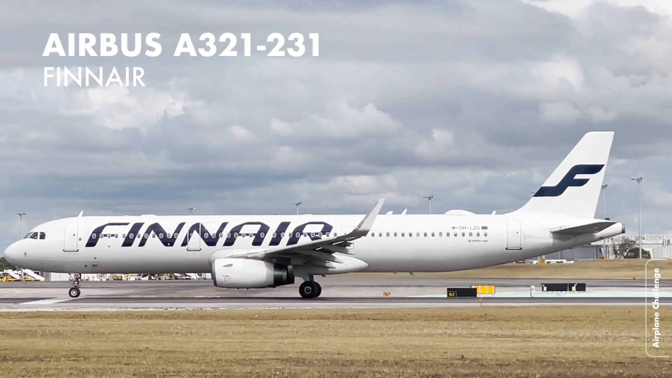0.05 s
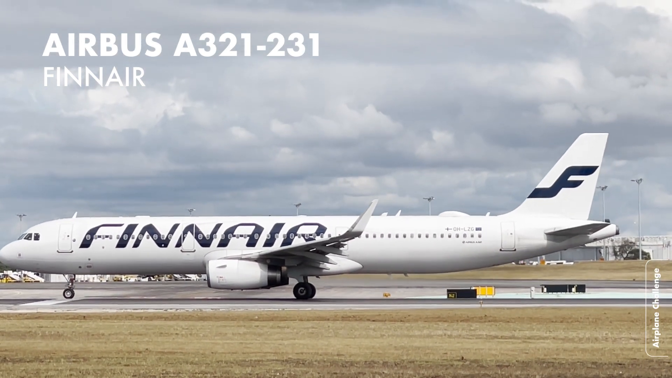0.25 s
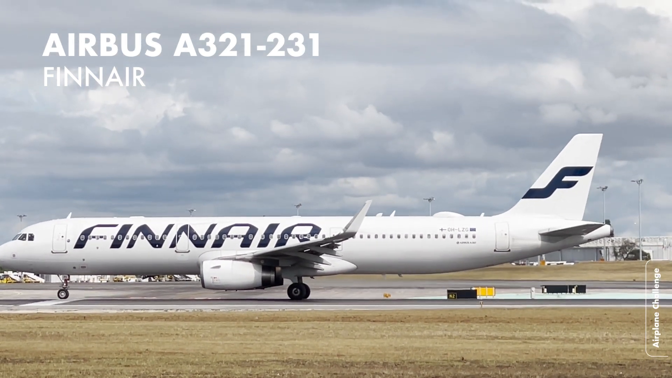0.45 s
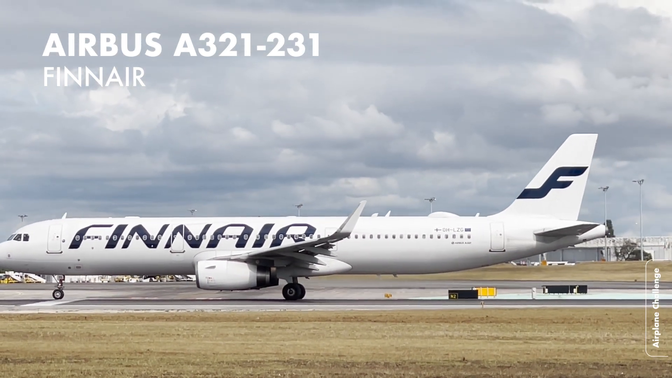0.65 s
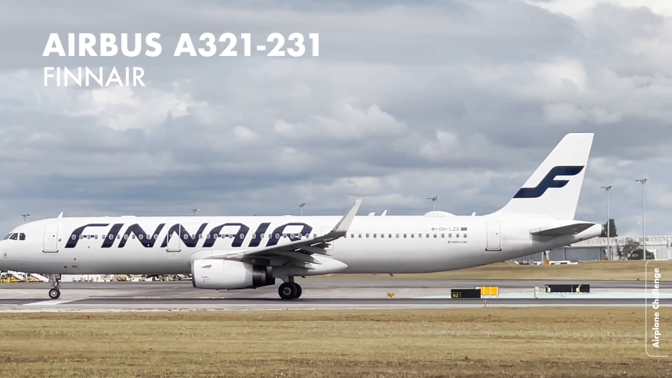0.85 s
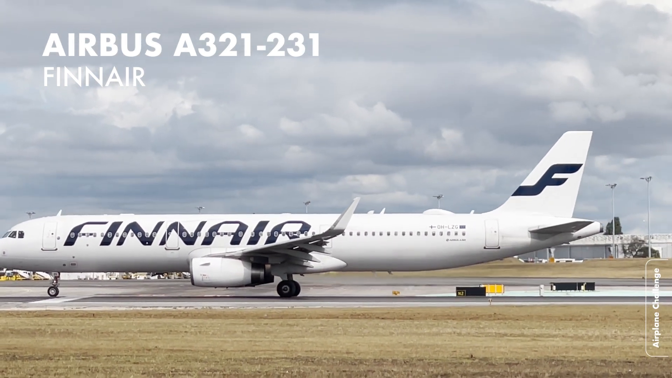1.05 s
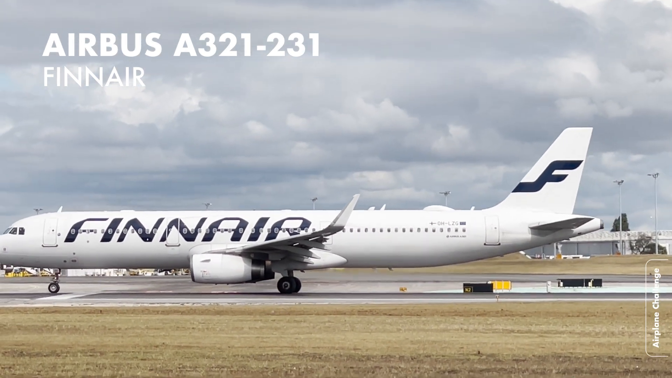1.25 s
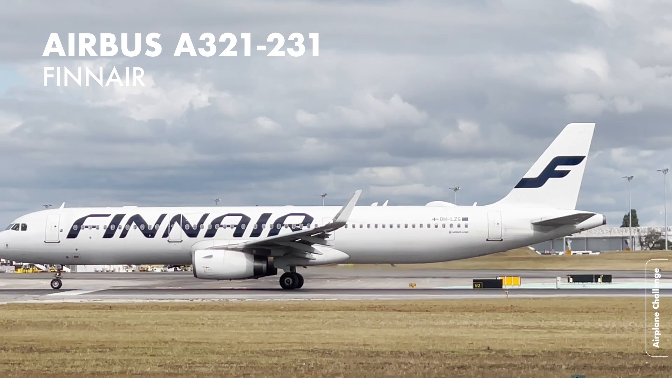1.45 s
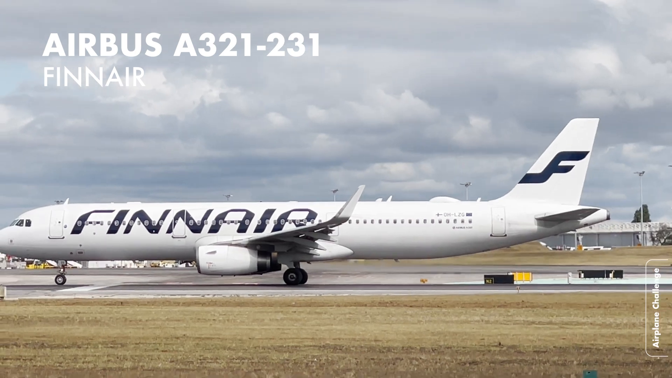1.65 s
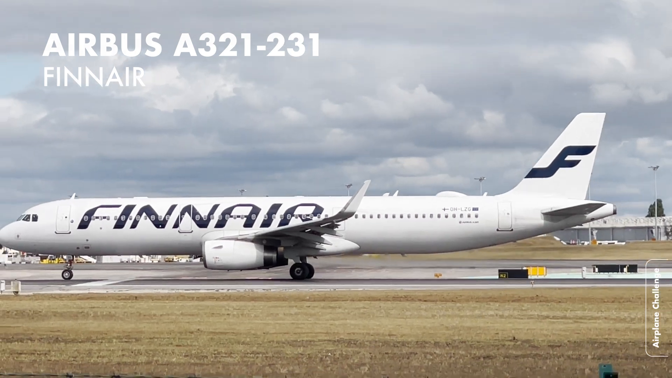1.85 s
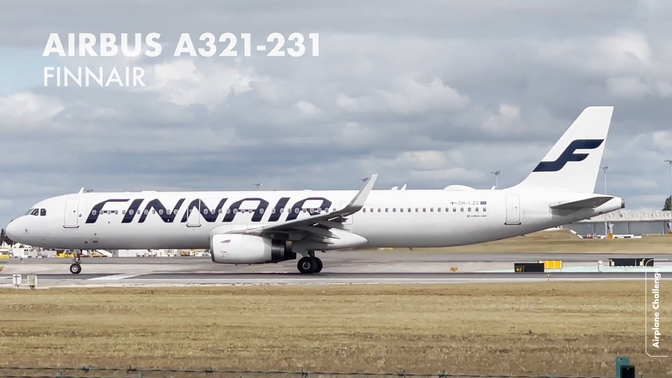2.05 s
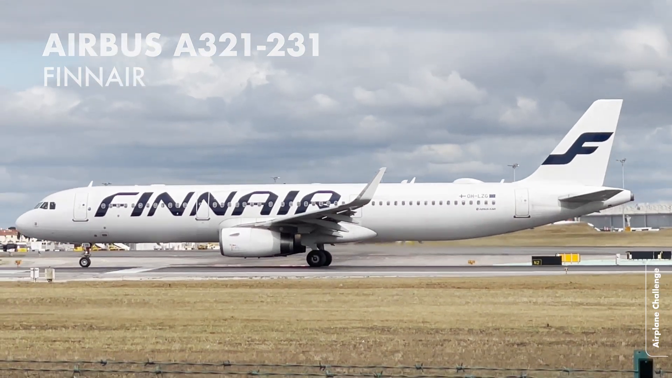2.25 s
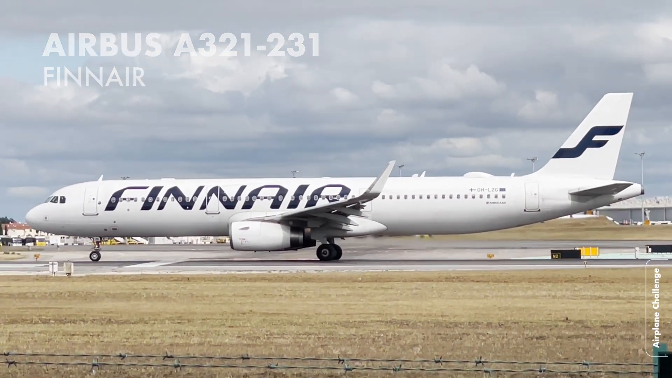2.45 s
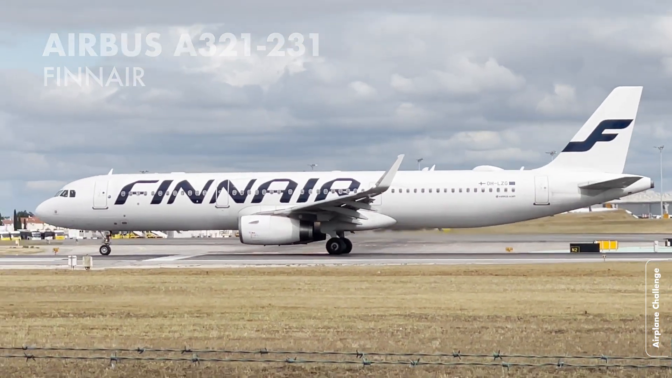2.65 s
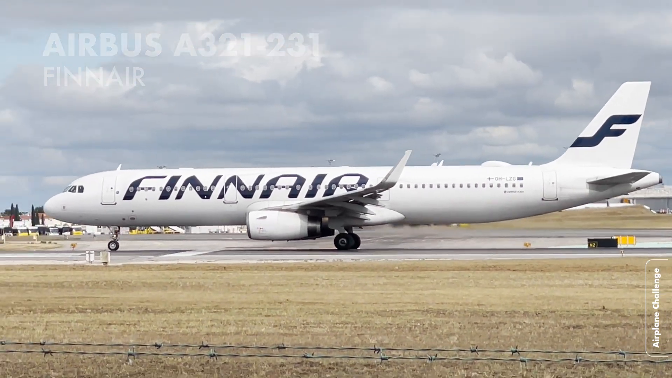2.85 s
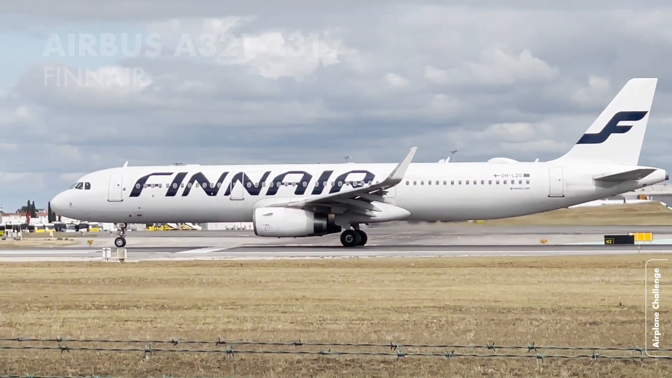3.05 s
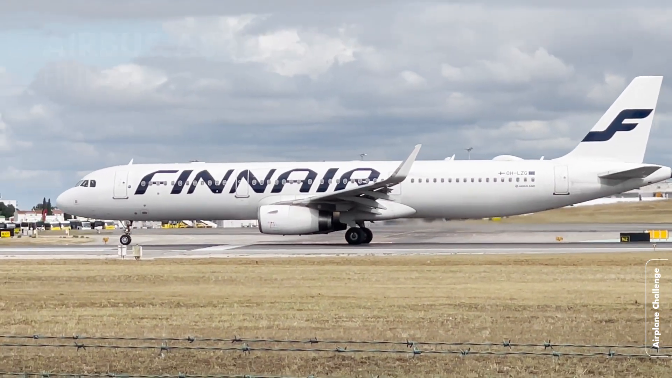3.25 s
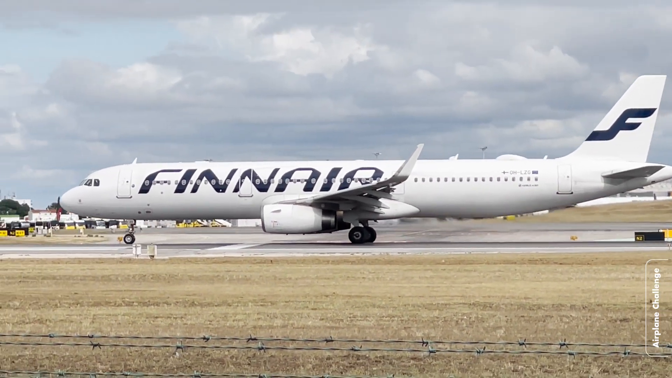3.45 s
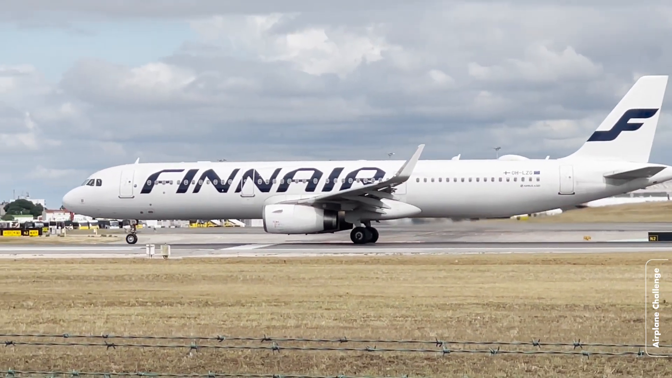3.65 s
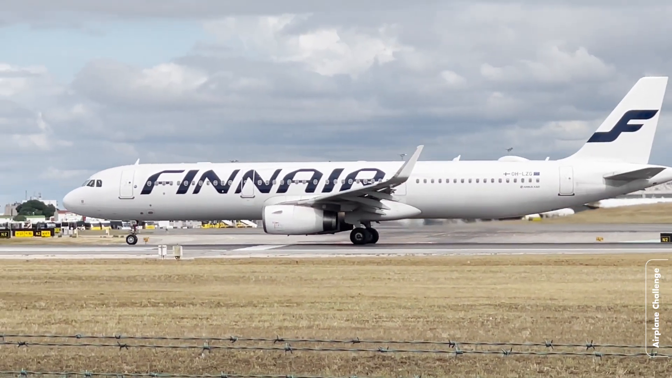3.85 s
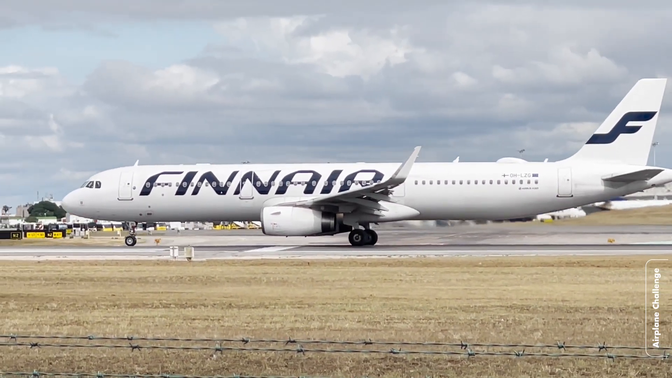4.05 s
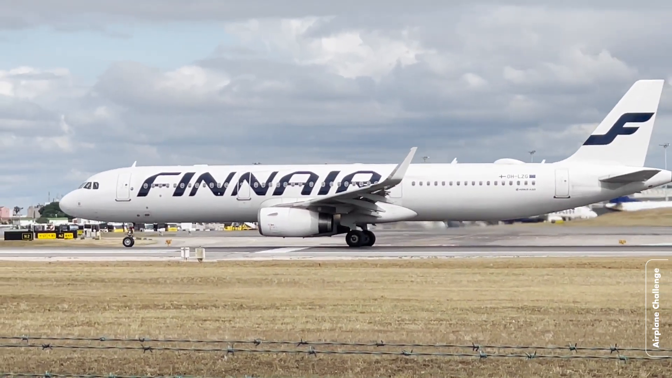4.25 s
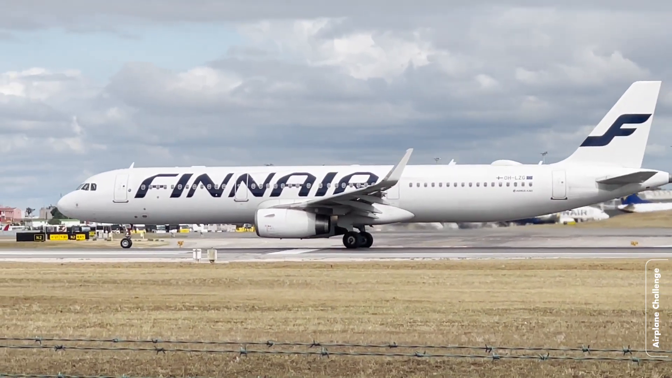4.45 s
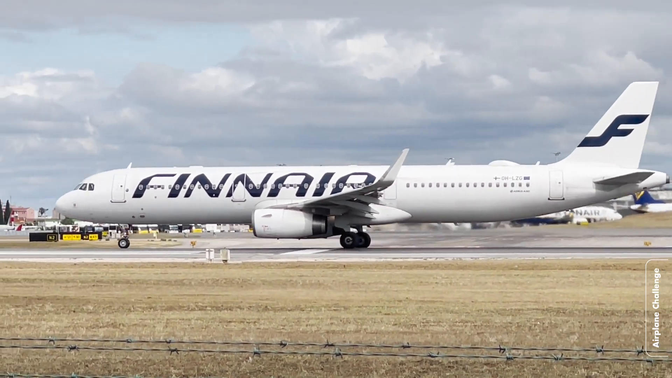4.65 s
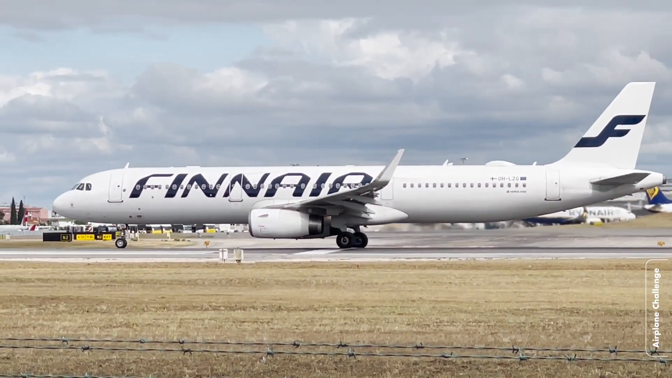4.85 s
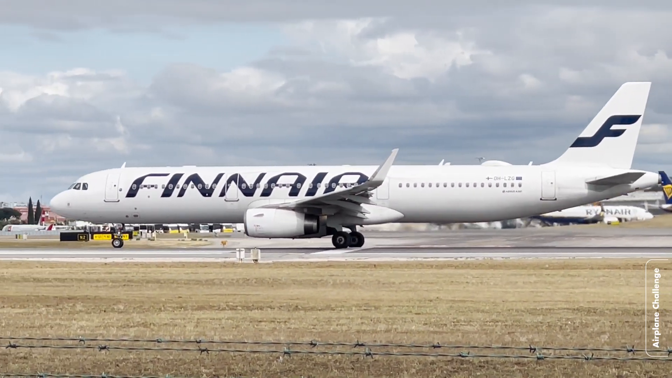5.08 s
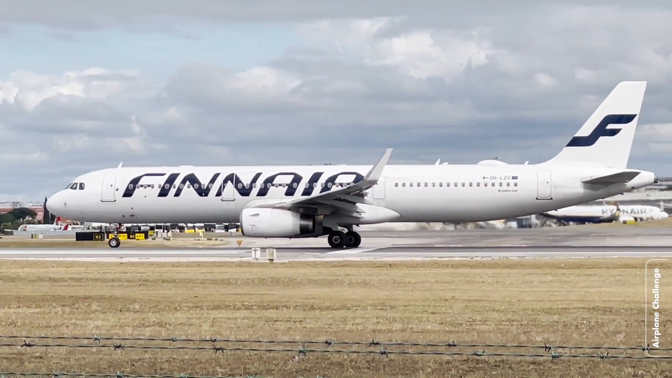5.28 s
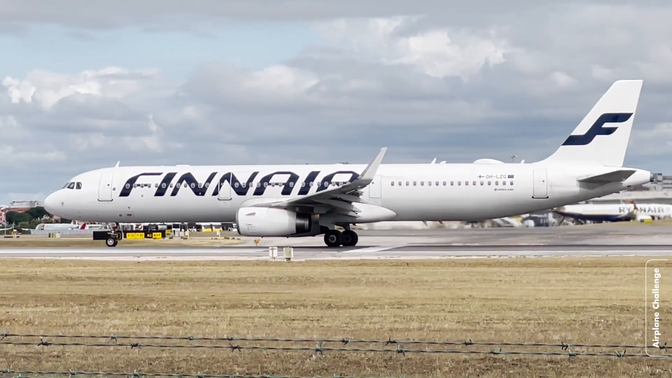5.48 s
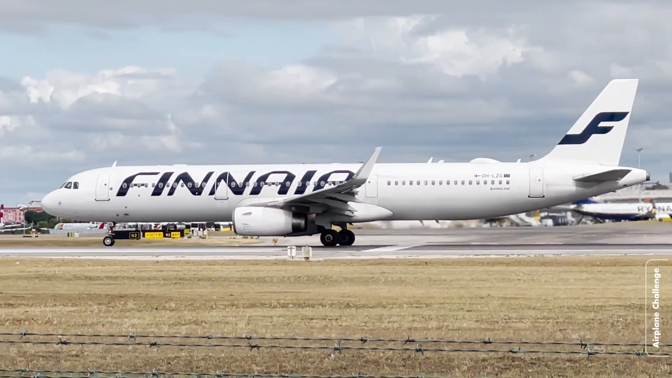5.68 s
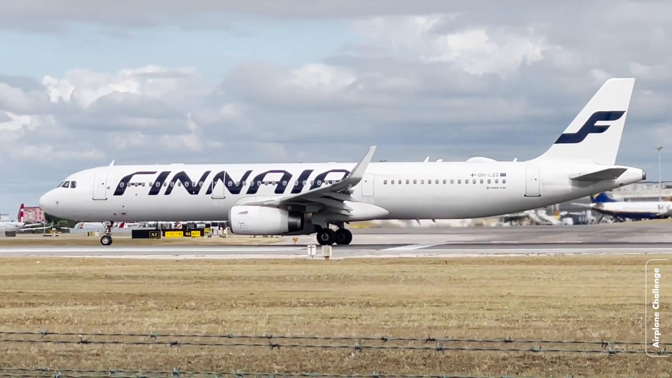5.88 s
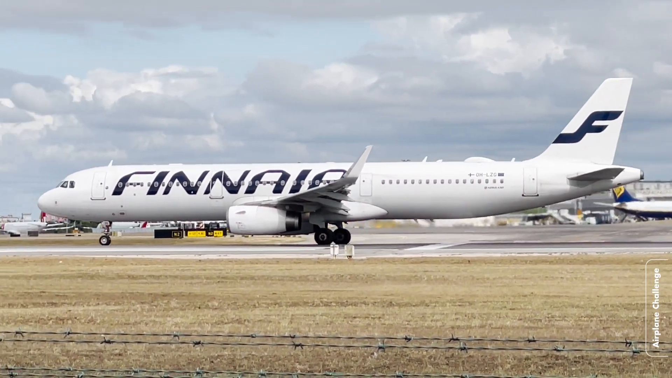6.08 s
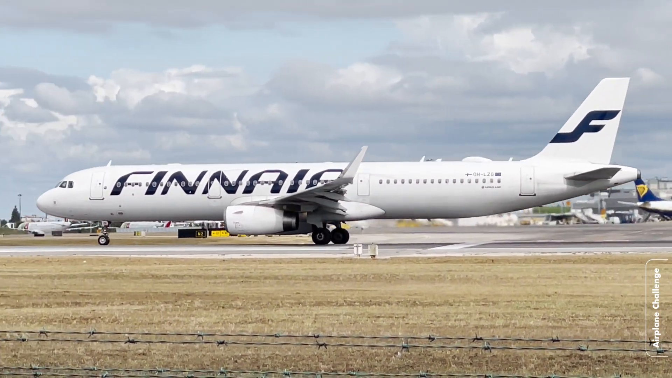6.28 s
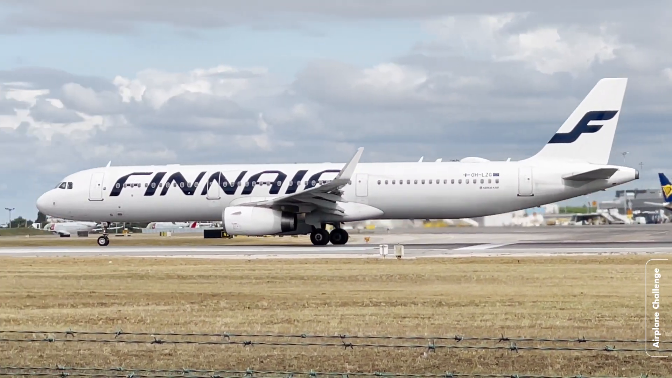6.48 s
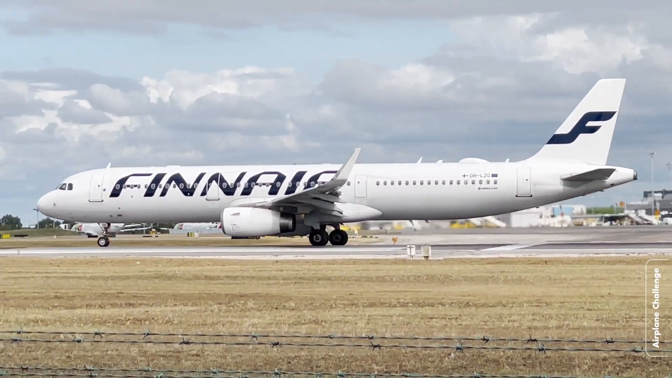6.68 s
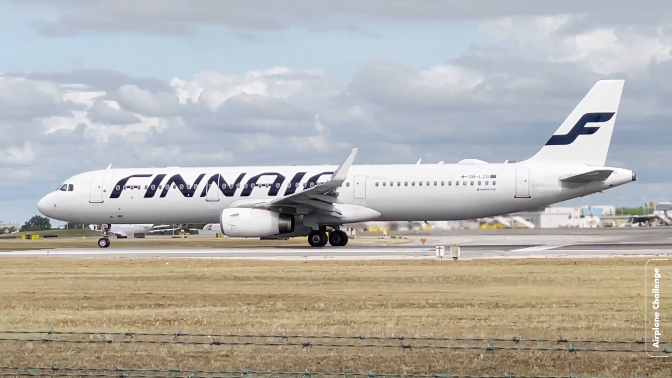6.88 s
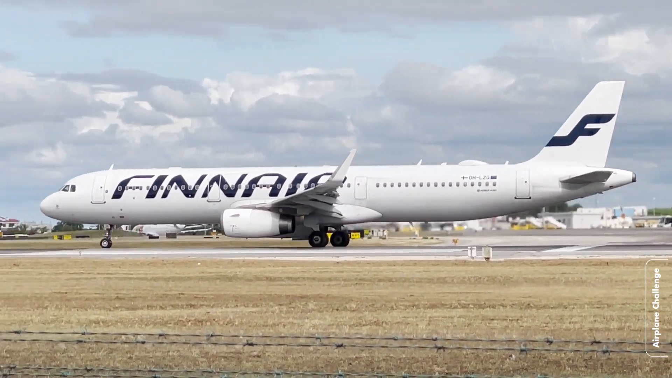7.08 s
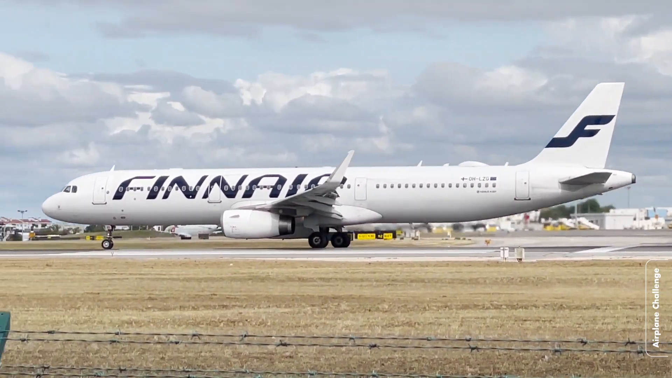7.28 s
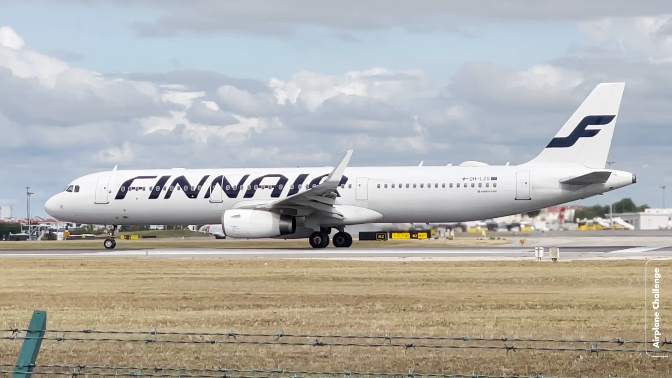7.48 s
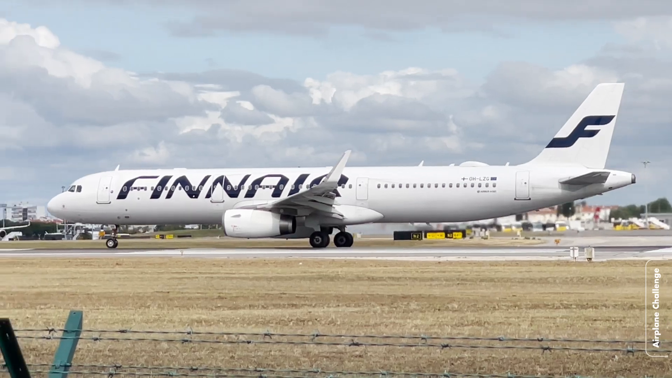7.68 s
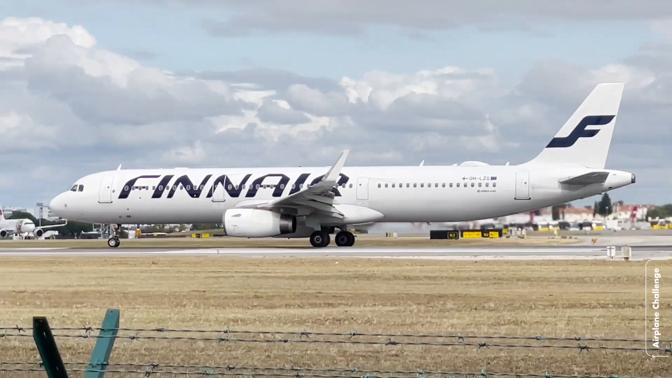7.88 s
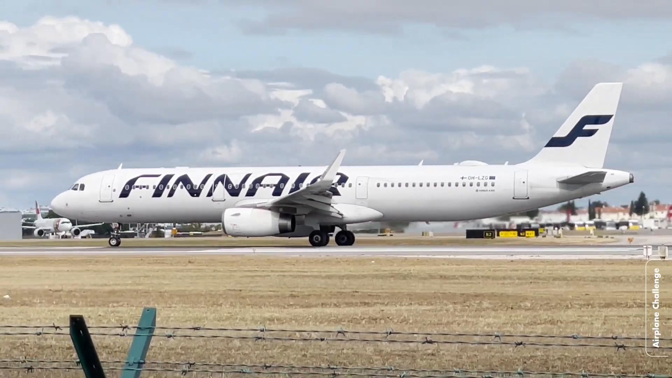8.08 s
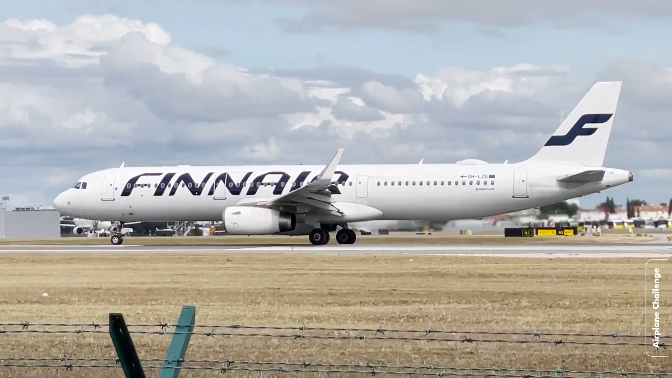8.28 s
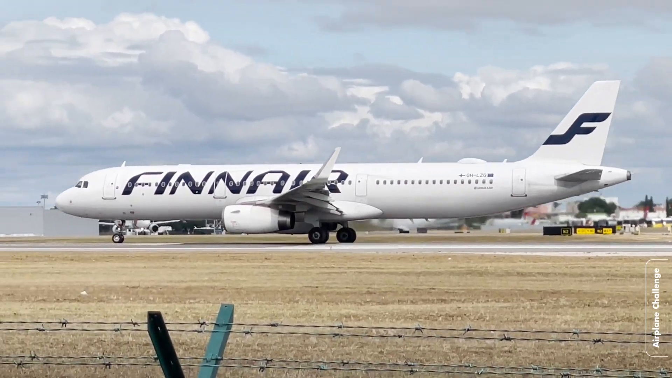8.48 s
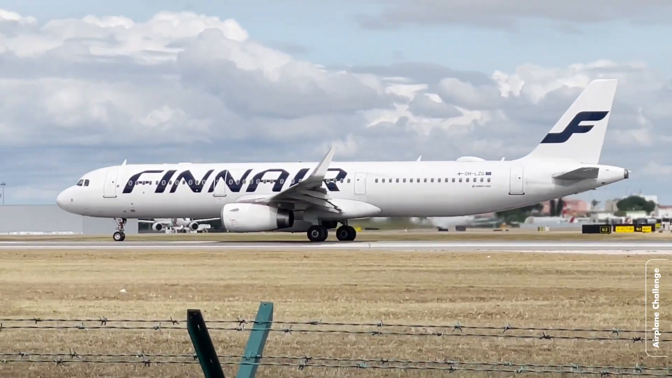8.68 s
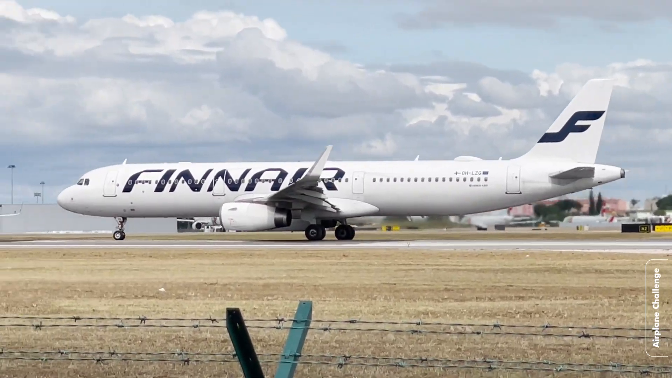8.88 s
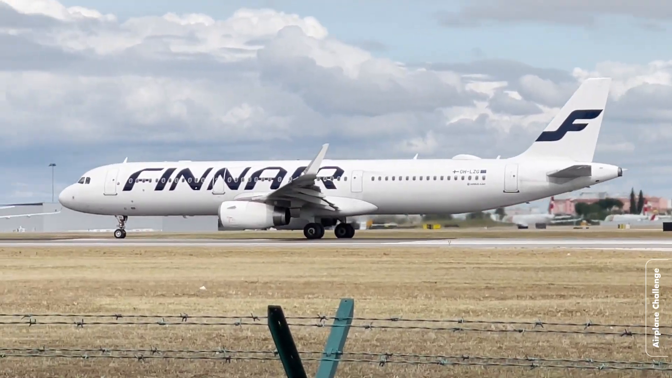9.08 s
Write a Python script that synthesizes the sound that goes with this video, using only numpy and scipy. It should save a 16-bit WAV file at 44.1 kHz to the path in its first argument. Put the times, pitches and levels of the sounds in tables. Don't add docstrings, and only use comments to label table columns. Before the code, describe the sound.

Jet engines idle across open grass, then rise in pitch and swell to full roar, while a brief gust buffets the microphone early on.

```python
import sys
import numpy as np
from scipy import signal
from scipy.fft import rfft, irfft
from scipy.io import wavfile

SR = 44100
rng = np.random.default_rng(int(sys.argv[2]) if len(sys.argv) > 2 else 0)


def store_pcm(level_fs):
    pcm = np.round(np.clip(level_fs, -1, 1) * 32767).astype(np.int16)
    wavfile.write(sys.argv[1], SR, np.atleast_2d(pcm).T)


def voltage_ratio(decibels):
    exponent = np.asarray(decibels, float) / 20
    return 10 ** exponent


N = 402633
TIME_S = np.arange(N) / SR


def rms_one(x):
    return x / np.sqrt(np.mean(x ** 2) + 1e-20)


def in_time(rows):
    s, *columns = np.transpose(rows)
    return [np.interp(TIME_S, s, column) for column in columns]


def at_hz(points, hz):
    point_hz, value = np.transpose(points)
    return np.interp(np.log(hz), np.log(point_hz), value)


def bumps(rows):
    coarse_s = np.arange(0, N / SR, .005)
    db = sum(peak_db * np.exp(-((coarse_s - s) / half_s) ** 2) for s, half_s, peak_db in rows)
    return np.interp(TIME_S, coarse_s, db)


def drift(rate_hz):
    pole = np.exp(-16 * np.pi * rate_hz / SR)
    noise = rng.standard_normal(N // 8 + 4002)
    slow = signal.lfilter([1], [1, -2 * pole, pole * pole], noise)[4000:]
    return np.interp(np.arange(N) / 8, np.arange(len(slow)), rms_one(slow))


def whine(hz, blur_hz, steady):
    steady = np.clip(steady, 0, 1)
    direct = np.sqrt(2 * steady)
    scattered = (drift(blur_hz) + 1j * drift(blur_hz)) * np.sqrt(1 - steady)
    carrier = np.exp(2j * np.pi * np.cumsum(hz) / SR)
    return np.real((direct + scattered) * carrier)


# time in seconds, frequency in Hz, level in dB.
NEIGHBOUR_FAN = [
    (0, 883, -57),
    (1.5, 885, -57),
    (2.3, 900, -56),
    (2.9, 920, -55),
    (3.3, 930, -66),
    (9.13, 930, -75),
]


def neighbour():
    band = signal.cheby1(3, 1, [1925, 2750], "band", fs=SR, output="sos")
    rush = rms_one(signal.sosfilt(band, rng.standard_normal(N)))
    hz, db = in_time(NEIGHBOUR_FAN)
    return voltage_ratio(db) * whine(hz, 6.8, steady=0.72) + voltage_ratio(-47.5) * rush


# start in seconds, end in seconds,
# start in Hz, end in Hz, level in dB.
SQUEAL = (1.68, 1, 555, 527, -59)


def squeal():
    start_s, end_s, from_hz, to_hz, db = SQUEAL
    shape = np.clip(np.minimum(TIME_S - start_s, end_s - TIME_S) / .025, 0, 1)
    hz = np.interp(TIME_S, [start_s, end_s], [from_hz, to_hz])
    left_right = np.array([[1], [.3]])
    return voltage_ratio(db) * shape * whine(hz, 6, steady=.8) * left_right


# time in seconds, level in dB.
FLUTTER = [
    (1.6, -53),
    (2.1, -29.5),
    (2.5, -34),
    (2.8, -31),
    (3.1, -35),
    (3.3, -25),
    (3.6, -39.5),
    (4.0, -50.5),
    (4.4, -62.5),
]
# start in seconds, peak in dB, left minus right in dB.
BUFFETS = [(2.015, -26, -3), (2.061, -30, 1.0), (2.151, -32, 0.5), (2.212, -45, 0.5), (2.265, -27, 2.0),
           (2.332, -28, 1.5), (2.495, -27, 4), (2.71, -33, 2.0), (2.758, -16, 2), (2.798, -9.5, 3),
           (2.823, -19, 0.0), (2.89, -19, 2), (3.003, -24, 5), (3.064, -25, 0.5), (3.241, -13.5, 4),
           (3.328, -17.5, 3), (3.673, -34, 0.5)]


def gust():
    common, own = rng.standard_normal(N), rng.standard_normal((2, N))
    band = signal.butter(3, [45, 150], "band", fs=SR, output="sos")
    air = signal.sosfilt(band, common + own)
    out = rms_one(air) * voltage_ratio(in_time(FLUTTER)[0] + 4.54 * drift(24))
    buffet_hz, swings = 173, 1.6
    turn = np.arange(round(swings * SR / buffet_hz)) * buffet_hz / SR
    shape = -np.sin(2 * np.pi * turn) * np.hanning(len(turn))
    for s, db, pan_db in BUFFETS:
        start = round(s * SR)
        pan = voltage_ratio(np.array([[pan_db], [-pan_db]]) / 2)
        out[:, start:start + len(turn)] += shape * voltage_ratio(db - 1.5) * pan
    return out


# idle dB, full dB, power of thrust, share of exposure.
ROAR_LAW = [
    (-29, -13, 0.54, .05),
    (-41.5, -19.5, 0.89, 1),
    (-43.5, -23.5, 1.4, 0.97),
    (-50.5, -32, 0.94, 1.29),
]
ROAR_LATE_S = [0, 0.37, 0.00059, 0.027]
ROAR_FULL_AT = [0.96, 1, 0.93, 0.96]
# time in seconds, level in dB.
EXPOSURE = [(0, 1), (.3, -0.8), (1.5, -0.1), (2.5, 1.2), (3.5, 1), (4.2, 1.6), (4.9, 1.15), (5.35, 2),
            (5.7, -0.7), (6.0, 0.65), (6.4, 1.05), (7.0, 1.8), (7.5, 4), (7.9, 6), (8.2, 4.5), (8.5, 3),
            (8.75, 3.5), (9.0, 4.5)]
# time in seconds, height in dB.
EDDIES = [(.12, 4.5), (1.019, -1), (1.27, -5), (1.37, 5), (1.6, -6.5), (1.86, 3.5), (1.98, -13),
          (2.16, 6.5), (2.41, -10), (2.52, 4), (2.64, -3), (2.8, 2), (3.0, -3), (4.02, 3), (4.1, -3),
          (4.17, 5), (4.931, 3.5), (5.03, -1), (5.24, 4), (5.72, 3), (5.95, -3.5), (6.53, 0), (8.32, 3.5),
          (8.49, -9.5), (8.85, 2)]


def roar_levels(thrust):
    exposure_s, exposure_db = np.transpose(EXPOSURE)
    levels = []
    for (idle_db, full_db, power, share), late_s, full_at in zip(ROAR_LAW, ROAR_LATE_S, ROAR_FULL_AT):
        growth = np.minimum(thrust / full_at, 1) ** power
        exposed_db = share * np.interp(TIME_S - late_s, exposure_s, exposure_db)
        levels.append(idle_db + (full_db - idle_db) * growth + exposed_db)
    eddy_half_s = 0.039
    levels[0] = levels[0] + bumps([(s, eddy_half_s, db) for s, db in EDDIES])
    leaves_s, loss_db_per_s = 8.33, 3
    levels[-1] = levels[-1] - loss_db_per_s * np.maximum(TIME_S - leaves_s, 0)
    return levels


ROAR_EDGES_HZ = [130, 450, 2800]
# frequency in Hz, density in dB per Hz.
IDLE_COLOUR = [(20, -31.5), (40, -15), (58, 0), (75, -0.5), (100, -9), (200, -23), (450, -38), (850, -34.5),
               (1250, -38.5), (2400, -38.5), (3100, -41.5), (6000, -47), (10000, -56.5)]
FULL_COLOUR = [(20, -30), (45, -7), (70, -0.5), (110, -4.5), (165, -11.5), (270, -12), (500, -20.5),
               (760, -17.5), (960, -21.5), (1300, -17.5), (1900, -21.5), (2700, -29), (5200, -36),
               (10000, -45.5)]
# frequency in Hz, dB relative to the common part.
IDLE_SIDE = [(60, -30), (110, -22), (200, -17), (370, -10), (690, -9), (1260, -9), (2320, -10.5),
             (4270, -6.5), (7850, -24.5), (9500, 3), (14400, -4.5)]
FULL_SIDE = [(60, -39), (110, -30), (200, -33), (370, -22.5), (690, -18.5), (1260, -24), (2320, -14),
             (4270, -11), (7850, -12), (9500, 3), (14400, -11)]
# frequency in Hz, left minus right in dB.
LEFT_LEAN = [(60, 0.5), (110, 1.5), (200, 1.5), (370, 1.0), (690, 0.5), (1260, 1.0), (2320, 0), (4270, 0.5),
             (7850, -4.5), (14400, 9.5)]
# frequency in Hz, share of difference -1 to 1.
LEFT_LEAD = [(1300, 0), (2300, .8), (4800, .9), (6000, 0), (8500, -.5), (9300, -.95)]


def roar(thrust):
    edges_hz = 20 * 2 ** np.arange(0, 9.7, 1 / 3)
    centre_hz = np.sqrt(edges_hz[:-1] * edges_hz[1:])
    part = np.searchsorted(ROAR_EDGES_HZ, centre_hz)
    slow = thrust[::256]
    idle_db = at_hz(IDLE_COLOUR, centre_hz)[:, None]
    full_db = at_hz(FULL_COLOUR, centre_hz)[:, None]
    power = voltage_ratio(2 * (idle_db * (1 - slow) + full_db * slow)) * centre_hz[:, None]
    white = rng.standard_normal((2, 2, N))
    levels = roar_levels(thrust)
    swell = drift(3.3)
    out = np.zeros((2, N))
    for k, hz in enumerate(centre_hz):
        low_hz, high_hz = edges_hz[k:k + 2]
        band = signal.butter(2, [low_hz, high_hz], "band", fs=SR, output="sos")
        mid, side = signal.sosfilt(band, white[k % 2]) / np.sqrt(2 * (high_hz - low_hz) / SR)
        share = np.sqrt(power[k] / power[part == part[k]].sum(0))
        gain = np.interp(np.arange(N) / 256, np.arange(len(slow)), share)
        gain *= voltage_ratio(levels[part[k]] + 0.37 * swell + 0.54 * drift(3.5))
        lead = np.clip(at_hz(LEFT_LEAD, hz), -1, 1) * (.6 + .4 * thrust)
        early = np.gradient(mid) / np.sin(2 * np.pi * hz / SR * 0.69)
        side = lead * early + np.sqrt(1 - lead ** 2) * side
        side *= voltage_ratio(at_hz(IDLE_SIDE, hz) * (1 - thrust) + at_hz(FULL_SIDE, hz) * thrust)
        lean = voltage_ratio(at_hz(LEFT_LEAN, hz) / 2)
        out += gain * np.array([(mid + side) * lean, (mid - side) / lean])
    return out


WHINE_ORDERS = [1, 2, 3, 3.86, 4.04]
WHINE_BLUR_HZ = [10, 14, 18, 35, 20]
# idle dB, full dB, power of thrust.
WHINE_LAW = [
    (-56, -38.5, .8),
    (-56.5, -47, .6),
    (-70, -55, .5),
    (-75, -46, .33),
    (-64, -42, .55),
]
# time in seconds, half length in seconds, height in dB.
FLARES = [
    [(2.3, .07, 6), (2.8, .05, -6), (3.03, .13, 8), (4.4, .17, 5), (4.94, .08, 6), (5.55, .15, -5),
     (5.94, .15, 9), (7.97, .12, -6), (8.8, .1, -7)],
    [(2.2, .6, -10), (4.1, .1, -6), (4.33, .08, 4), (5.1, .15, 3), (7.9, .3, 5)],
    [(3.9, .3, 8), (4.95, .3, -7), (5.8, .35, -7), (7.8, .12, 8)],
    [(3.82, .12, -8), (6.0, .15, 4), (6.8, .12, -8)],
    [(1.75, .15, 4), (2.36, .1, 6), (2.81, .1, 7), (3.07, .15, -5), (3.5, .15, 7), (4.8, .3, -7),
     (5.75, .3, -5), (7.8, .15, 7), (8.45, .12, 4)],
]
# multiple of fan rate, dB relative to front stage at idle, the same at full thrust.
FAINT_LINES = [
    (.592, -30, 2),
    (4.4, -12, -13),
    (6.54, -11, -60),
]


def blades(fan_hz, thrust):
    firm = np.minimum(5 * thrust, 1.6 - thrust).clip(0, 1)
    out = np.zeros(N)
    levels = []
    for order, blur_hz, law, flares in zip(WHINE_ORDERS, WHINE_BLUR_HZ, WHINE_LAW, FLARES):
        idle_db, full_db, power = law
        flare_db = bumps(flares)
        db = idle_db + (full_db - idle_db) * thrust ** power + flare_db
        levels.append(db)
        tone = whine(order * fan_hz, blur_hz, steady=.2 + .45 * firm + flare_db / 20)
        out += voltage_ratio(db - 1 + 2.5 * firm + drift(12)) * tone
    for order, idle_db, full_db in FAINT_LINES:
        db = levels[-1] + idle_db + thrust * (full_db - idle_db)
        out += voltage_ratio(db) * whine(order * fan_hz, 29, steady=0.42)
    out += voltage_ratio(levels[0] - 6.5 + 5.9 * thrust) * whine(1.01 * fan_hz, 90, steady=0)
    hiss_db = roar_levels(thrust)[-1]
    out += voltage_ratio(hiss_db - 11.5 + 0.66 * thrust + 7.7 * firm) * whine(3.93 * fan_hz, 580, steady=0)
    out += voltage_ratio(hiss_db - 62 + 62 * thrust + 4 * drift(8)) * whine(6.13 * fan_hz, 220, steady=.1)
    return out


# time in seconds, fan blade rate in Hz.
FAN_SPEED = [(0.0, 929), (0.8, 929), (1.4, 938), (2.0, 991), (2.5, 1071), (3.0, 1142), (3.5, 1221),
             (4.0, 1326), (4.5, 1471), (5.0, 1616), (5.3, 1713), (5.6, 1807), (5.9, 1835), (6.3, 1846),
             (7.0, 1854), (7.7, 1857), (8.4, 1849), (9.13, 1842)]


def scene():
    fan_hz = in_time(FAN_SPEED)[0]
    thrust = np.clip(fan_hz / fan_hz[0] - 1, 0, 1) ** 1.43
    left_right = voltage_ratio(np.array([[1.2], [-.9]]))
    tones = (blades(fan_hz, thrust) + neighbour()) * left_right
    return roar(thrust) + tones + squeal() + gust()


def pass_bands(x, up_to_hz, bands):
    hz = np.arange(N + 1) * SR / (2 * N)
    gain = np.clip((up_to_hz - hz) / 400, 0, 1)
    for low_hz, high_hz, db in bands:
        gain += voltage_ratio(db) * np.clip(np.minimum(hz - low_hz, high_hz - hz) / 60 + .5, 0, 1)
    return irfft(rfft(np.r_[x, x[::-1]]) * gain)[:N]


def low_pass(x):
    return signal.sosfilt(signal.butter(12, 15030, fs=SR, output="sos"), x)


# from Hz, to Hz, level in dB.
MID_TREBLE = [(10300, 11750, -38), (12900, 13750, -22)]
SIDE_TREBLE = [(7400, 8300, -3), (8900, 10300, -1), (10300, 11000, -8), (13100, 14400, -16)]


def record(dry):
    bass_cut = signal.butter(3, 30, "high", fs=SR, output="sos")
    fade_out = np.minimum(np.arange(N)[::-1] / 80, 1)
    x = signal.sosfilt(bass_cut, dry) * fade_out
    left, right = x / (1 + (np.abs(x) / .95) ** 4) ** .25
    mid = pass_bands((left + right) / 2, 10080, MID_TREBLE)
    side = pass_bands((left - right) / 2, 5500, SIDE_TREBLE)
    return low_pass(np.array([mid + side, mid - side]))


dry = scene()
out = record(dry)
store_pcm(out)
```